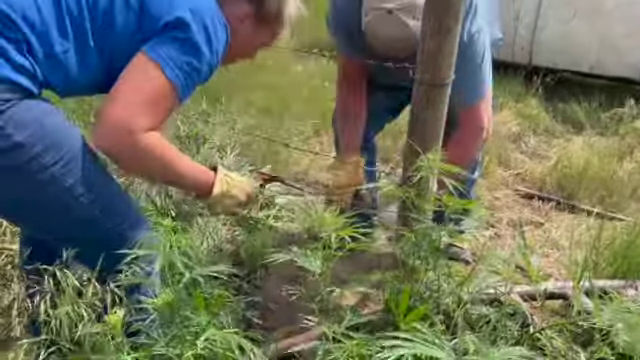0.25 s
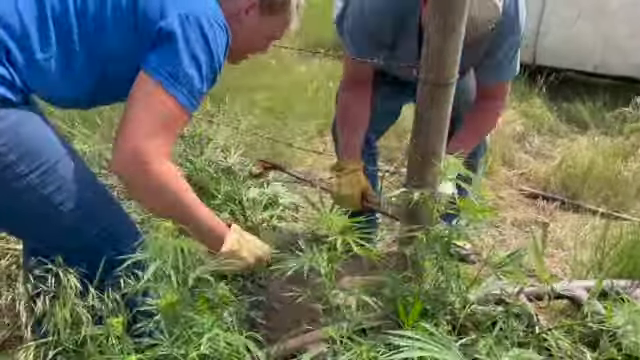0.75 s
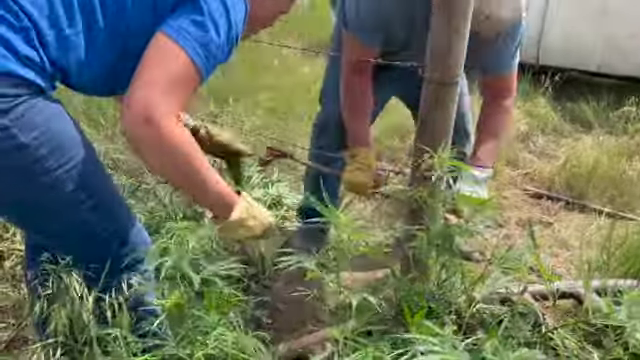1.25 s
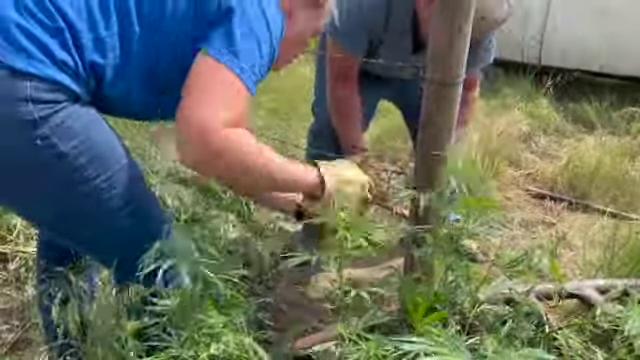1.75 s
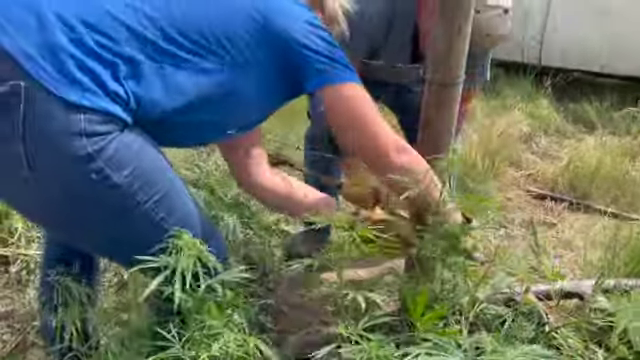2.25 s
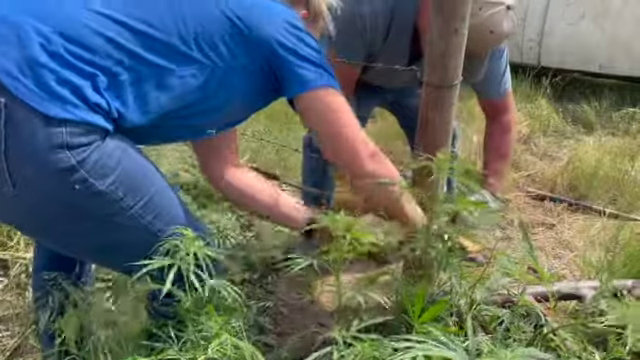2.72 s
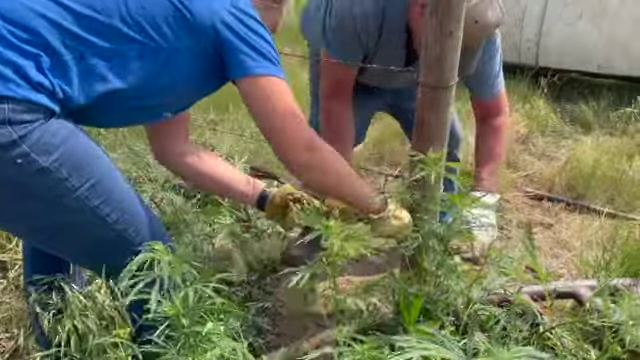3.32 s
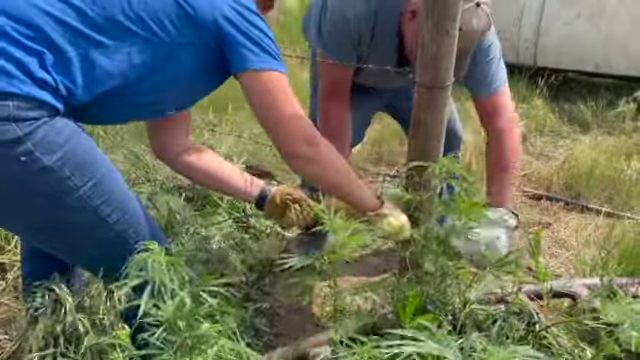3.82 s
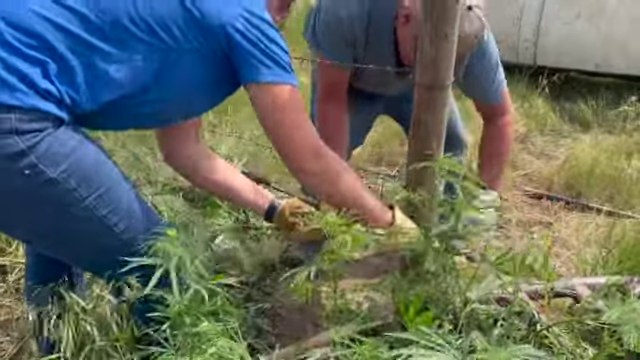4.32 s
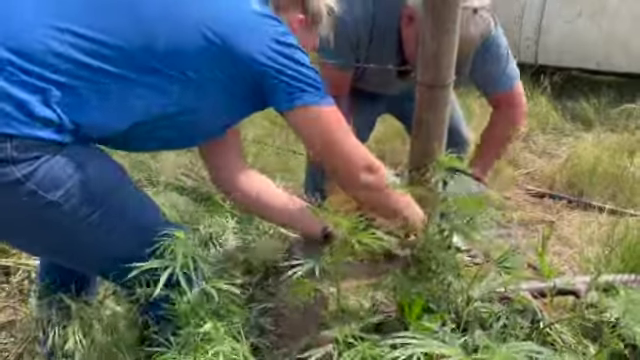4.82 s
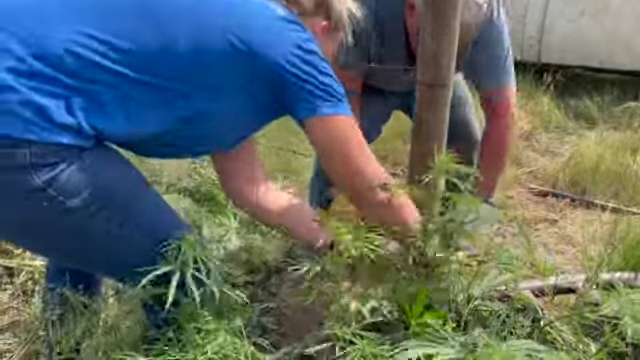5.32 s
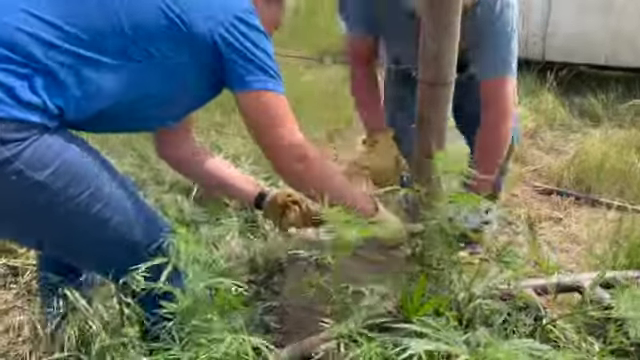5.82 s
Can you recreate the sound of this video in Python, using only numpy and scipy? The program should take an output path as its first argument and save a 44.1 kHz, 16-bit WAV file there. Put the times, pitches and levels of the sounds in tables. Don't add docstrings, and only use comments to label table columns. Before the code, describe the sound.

Outdoors, tough stalks rip and crack up close with brief metallic wire rings, under lumpy wind rumble, faint birdsong and a distant engine.

```python
import sys
import numpy as np
from scipy import signal
from scipy.fft import rfft, irfft, next_fast_len
from scipy.io import wavfile
from scipy.ndimage import uniform_filter1d, map_coordinates

SR = 44100
rng = np.random.default_rng(int(sys.argv[2]) if len(sys.argv) > 2 else 0)


def nominal_scale(level):
    x = np.asarray(level, float) / 20
    return 10 ** x


def dump(signal):
    limited = np.clip(np.atleast_2d(signal).T, -1, 1)
    pcm = np.round(limited * 32767).astype(np.int16)
    wavfile.write(sys.argv[1], SR, pcm)


N = 267466

# frequency in Hz, density in dB per Hz.
FIELD_COLOUR = [(88, -32.5), (140, -6), (230, -12.5), (317, -5.5), (425, -5), (900, 3), (1350, -9),
                (1970, -22), (4510, -15), (5300, -16.5), (7080, -26), (9000, -27.5), (11500, -29),
                (15550, -25), (15950, -64)]
# time in seconds, level in dB.
GRASS_HISS = [(0.0, -76.5), (1.08, -70.5), (1.18, -75), (1.43, -79), (1.57, -61.5), (1.7, -76.5),
              (1.96, -70.5), (2.24, -67.5), (2.48, -67), (2.63, -71.5), (3.07, -68), (3.3, -76),
              (3.85, -75), (4.15, -81.5), (4.3, -71), (4.98, -73), (5.26, -73.5), (6.06, -72)]
# time in seconds, level in dB.
ENGINE_DRONE = [(0, -64), (.7, -60), (1.3, -63), (2.5, -61), (3.5, -60.5), (4.1, -62), (4.45, -59),
                (4.8, -56), (5.4, -56), (5.7, -52), (6.06, -55)]
# frequency in Hz, width in Hz, level in dB.
ENGINE_LINES = [(98.5, 2, -53.5), (897, 9.13, -70.5), (925, 120, -77), (1247, 170, -64), (1696, 370, -68),
                (2190, 220, -69.5), (3308, 200, -78), (3950, 480, -75), (2883, 800, -68)]
# first note in seconds, last note in seconds, starting pitch in Hz, level in dB.
TRILLS = [(0.042, 0.117, 5550, -57.5), (0.187, 0.288, 5630, -55), (0.396, 0.487, 5580, -57.5),
          (0.63, .66, 5600, -57), (0.77, 0.87, 5600, -54.5), (0.994, 1.061, 5600, -56),
          (1.156, 1.253, 5580, -52.5), (1.78, 1.85, 5450, -68), (2.692, 2.76, 5400, -64),
          (3.422, 3.515, 5510, -53.5), (4.023, 4.097, 5580, -55), (4.532, 4.6, 5570, -62),
          (4.644, 4.683, 5930, -49.5), (5.01, 5.077, 5900, -49), (5.474, 5.572, 5900, -46.5),
          (5.648, 5.715, 5600, -55), (5.882, 6.015, 5600, -54)]

# time in seconds, strength in dB.
BREEZE = [(0, -54.5), (.7, -49.5), (1.45, -63.5), (2.4, -41), (3.85, -49.5), (4.6, -37), (5.33, -47.5),
          (6.06, -30)]
# peak in seconds, half-length in seconds, strength in dB,
# flutter over rumble in dB.
GUSTS = [(0.16, 0.051, -35, -2), (0.276, 0.048, -32.5, -12.5), (0.492, 0.084, -35, -3),
         (0.623, 0.043, -43, -1), (0.841, 0.012, -40, -20), (0.981, 0.035, -43.5, -9),
         (1.655, 0.027, -32.5, -11.5), (2.054, 0.044, -35.5, -10), (2.248, 0.027, -35, -4),
         (2.76, 0.016, -31, -2), (2.912, 0.046, -27, -6), (2.992, 0.025, -25.5, 1.5),
         (3.085, 0.14, -37.5, -4), (3.284, 0.051, -33, -5.5), (3.403, 0.038, -31, -20),
         (3.62, 0.048, -29.5, -3), (3.732, 0.1, -38.5, -6), (4.089, 0.096, -32.5, -0.5),
         (4.208, 0.22, -39, -4), (4.328, 0.046, -35, 4), (4.774, 0.071, -36.5, 4.5),
         (4.943, 0.13, -33, -11.5), (5.217, 0.056, -39.5, -5), (5.505, 0.13, -36, -4.5),
         (5.699, 0.056, -30, -10), (5.823, 0.012, -29.5, 0), (6.075, 0.039, -36.5, 2.5)]
# frequency in Hz, density in dB per Hz.
RUMBLE_COLOUR = [(13, -50.5), (22, -38.5), (42, -1), (60, 3.5), (109, -2), (179, 2), (250, 10.5),
                 (320, -15), (550, -120)]
FLUTTER_COLOUR = [(59, -7), (100, 10), (238, -1), (275, -2), (416, -10.5), (560, -17), (720, -25.5),
                  (1000, -55.5), (1300, -58.5), (2200, -120)]
# start in seconds, peak in dB, frequency in Hz.
EDDIES = [(0.128, -42, 194), (0.369, -25.5, 180), (0.436, -18.5, 167), (0.508, -22.5, 240),
          (0.596, -26, 145), (0.992, -35.5, 106), (1.635, -22, 103.7), (2.244, -31.5, 73),
          (2.735, -17.5, 106.2), (2.862, -25, 65.6), (2.991, -20.5, 183), (3.285, -17, 123),
          (3.59, -14, 158.5), (3.63, -14, 114), (4.044, -14.5, 107), (4.235, -15, 117), (4.305, -21.5, 250),
          (4.653, -13.5, 196), (4.717, -33, 244), (5.482, -28, 123), (5.715, -16, 86.7), (5.82, -15.5, 133),
          (6.026, -17, 126)]
# start in seconds, peak in dB, fading time in seconds.
FLAPS = [(0.135, -31, 0.0059), (0.167, -36, 0.0063), (0.208, -32, 0.0068), (0.244, -29, 0.0052),
         (0.298, -32, 0.0046), (0.368, -35.5, 0.0069), (0.439, -22.5, 0.0074), (0.467, -43, 0.0095),
         (0.501, -26.5, 0.011), (0.528, -28.5, 0.0045), (0.595, -35, 0.0066), (0.802, -40.5, 0.0081),
         (0.99, -37.5, 0.0045), (1.116, -39.5, 0.007), (1.209, -44, 0.005), (1.634, -38, 0.0058),
         (2.245, -44, 0.0057), (2.414, -34.5, 0.0069), (2.603, -33.5, 0.0049), (2.733, -38.5, 0.0072),
         (2.865, -26, 0.0083), (2.944, -41, 0.0098), (2.989, -14.5, 0.0075), (3.09, -39, 0.017),
         (3.12, -31.5, 0.0075), (3.223, -33, 0.005), (3.285, -28.5, 0.01), (3.563, -30.5, 0.017),
         (3.593, -19.5, 0.005), (3.628, -26, 0.0082), (3.948, -38, 0.0043), (4.007, -44, 0.0064),
         (4.046, -23, 0.0054), (4.104, -26, 0.0081), (4.235, -24.5, 0.0092), (4.308, -24, 0.0056),
         (4.33, -19, 0.0043), (4.352, -30.5, 0.0046), (4.508, -35, 0.0044), (4.563, -32, 0.0029),
         (4.637, -26, 0.0077), (4.657, -25, 0.011), (4.679, -20.5, 0.0064), (4.716, -17.5, 0.0085),
         (4.768, -20.5, 0.0074), (4.816, -27.5, 0.0062), (4.862, -23, 0.0032), (5.031, -30.5, 0.0063),
         (5.428, -36, 0.0058), (5.478, -35, 0.0096), (5.515, -29, 0.0057), (5.723, -40, 0.0067),
         (5.821, -17.5, 0.0035), (5.944, -26, 0.008), (6.007, -25, 0.0093), (6.032, -21, 0.0055)]

# start in seconds, end in seconds, scrape in dB,
# brightness in dB, wire ring in dB.
PULLS = [(0.64, 0.756, -57.5, -18, 9.5), (1.379, 1.453, -42, 0, -11.5), (1.424, 1.52, -57, -11, 0),
         (2.016, 2.116, -55.5, -17, 3.5), (3.703, 3.796, -55.5, -10, -12.5),
         (3.805, 3.827, -28.5, -2.5, -21.5), (1.537, 1.651, -30, 1, -13.5), (1.655, 1.676, -33, -7, -14),
         (1.684, 1.763, -46.5, -4.5, -14.5), (1.973, 2.056, -41, -6.5, -14), (2.101, 2.269, -35.5, -9, 0),
         (2.172, 2.223, -40, 10, 4.5), (2.395, 2.48, -47.5, -2.5, 7), (2.517, 2.611, -44.5, -10, -29),
         (2.605, 2.625, -45, -16, -22), (2.607, 2.719, -49, -18, -2.5), (2.836, 2.974, -57.5, -3, -18),
         (2.98, 3.01, -26.5, -8, -36), (2.999, 3.108, -43.5, -13.5, -29), (3.175, 3.213, -43, 0, -2.5),
         (3.629, 3.72, -44.5, 10, 5), (3.832, 3.91, -62.5, 12, -9), (4.416, 4.487, -52.5, -5, -16.5),
         (4.442, 4.546, -50.5, -6, -37), (4.718, 4.762, -50.5, 2, -19), (4.798, 4.944, -55.5, -4.5, -18),
         (4.894, 4.992, -40, -10, -4), (5.133, 5.304, -46.5, -6.5, -1)]
# start in seconds, peak in dB, brightness in dB, body in dB, staple ring in dB.
SNAPS = [(1.396, -43.5, 12, -44, -11.5), (1.527, -23, 3, -5.5, -16.5), (1.553, -24, -7, -38, 5.5),
         (1.6721, -5.5, 5, -12, 1), (1.9281, -22.5, -9, -8, -3), (2.161, -21.5, -10, -4.5, -32.5),
         (2.1853, -17, -1.5, -13, -7.5), (2.2028, -18, 2.5, -2, -38), (2.4417, -18, -12, -10, -11),
         (2.533, -15.5, 2.5, -4, -42), (2.526, -18, 3, -3, -48), (2.563, -19.5, -6, -5, -17.5),
         (2.9875, -11, 3, -5.5, -2), (3.0056, -12, -2, -7.5, -33.5), (3.0408, -15, 4.5, -11.5, -29),
         (3.636, -17.5, -6.5, -12, -16), (3.8217, -3.5, 2.5, -12, -13), (4.4738, -14.5, 7.5, -3.5, -18.5),
         (4.7245, -29.5, 0, 2, -16), (5.1752, -19, -9.5, -9, -19), (5.2233, -19, -8.5, -5, -4),
         (5.4435, -21.5, -3.5, 2.5, -40)]
# start in seconds, peak in dB, brightness in dB.
TICKS = [(0.64, -43, 8), (.657, -39.5, 3), (2.209, -24.5, -8), (2.214, -22, -4), (2.179, -27.5, 1.5),
         (5.236, -27, 6), (5.157, -39, -20), (4.9013, -37, -5), (3.0022, -21, -3), (0.7036, -30, -8),
         (0.836, -43, -1), (0.893, -44, 0), (0.951, -41.5, -4), (1.357, -41, -22), (1.3875, -33.5, 3),
         (1.008, -45, -15), (1.519, -37.5, -10), (2.6007, -32, -1), (4.456, -38.5, 0), (4.741, -31, -1),
         (4.5, -46, 7), (4.946, -26, -12), (5.166, -34, -13), (5.246, -34, 5), (1.884, -27, -7.5),
         (1.956, -33, -13), (1.996, -38.5, -13), (2.129, -27, -23), (2.6087, -27.5, 9), (2.6493, -33, 2.5),
         (2.835, -31.5, -23), (2.8588, -25, 2), (2.908, -28.5, -29), (2.934, -35.5, -11),
         (3.183, -41, -17.5), (3.277, -33, -5.5), (3.366, -36.5, -7), (3.872, -39.5, 4.5), (3.662, -44, 6),
         (4.297, -23, -7), (4.3635, -30.5, -1), (4.435, -27, -30), (4.767, -32, -15), (4.937, -28, -9),
         (5.1027, -22.5, -22), (5.127, -26.5, -14), (5.198, -20.5, -10)]
# frequency in Hz, density in dB per Hz.
STEM_COLOUR = [(290, -53), (500, -16), (720, -14), (1240, -7), (1450, -11), (2260, -3.5), (3070, 11),
               (5040, 6.5), (6500, 5), (8500, 0), (11600, -6.5), (15100, -9), (16000, -23), (16700, -64.5)]
# frequency in Hz, density in dB per Hz.
BLUR_COLOUR = [(500, -9), (1500, -15), (3200, 7), (4800, 1), (7000, -18), (12000, -28.5), (16000, -32.5),
               (16600, -91.5)]
# frequency in Hz, level in dB, 60 dB decay in seconds.
WIRE_MODES = [(2700, -11, .1), (3250, -7, .16), (3385, -4, .25), (3490, -7, .16), (3612, -3, .3),
              (3680, -3, .3), (3790, -5, .3), (3915, -5, .25), (4338, -6, .2), (4760, -8, .15),
              (5400, -12, .12), (10800, -18, .05)]
# frequency in Hz, level in dB, 60 dB decay in seconds.
STAPLE_MODES = [(3055, -2, .33), (3095, -4, .25), (3150, -6, .2), (6200, -17, .05), (11400, -16, .04)]
# start in seconds, length in seconds, pitch in Hz, level in dB.
SQUEAKS = [(1.402, .022, 6230, -33), (1.395, 0.047, 4820, -40), (1.395, .04, 11100, -43),
           (1.39, .06, 3100, -50.5), (2.994, .01, 3100, -26), (.657, .03, 14700, -52.5),
           (1.527, 0.013, 11500, -35), (1.55, 0.035, 11500, -31), (1.565, .025, 14700, -36.5),
           (1.568, .07, 3030, -36), (1.58, 0.046, 6230, -40.5), (1.6722, 0.013, 6700, -21.5),
           (1.6722, .014, 3070, -32.5), (1.6722, 0.011, 11400, -22), (1.987, .03, 3100, -42.5),
           (1.99, .025, 4970, -49), (2.02, .03, 4440, -54), (2.19, .01, 4500, -30),
           (2.1615, .012, 4400, -33.5), (2.194, .035, 6250, -36), (2.203, .12, 3600, -47.5),
           (2.125, .1, 1150, -48), (2.417, 0.066, 3400, -47), (2.422, .03, 6150, -54.5),
           (2.527, .02, 5280, -38.5), (2.524, 0.022, 6640, -34.5), (2.601, .025, 5000, -42),
           (2.597, .025, 3470, -49), (3.003, 0.011, 3700, -23.5), (3.002, .008, 4400, -25),
           (3.028, .06, 3100, -51), (3.0425, .008, 11400, -32), (3.662, .035, 4780, -37.5),
           (3.665, .05, 6200, -40.5), (3.657, .07, 10600, -43.5), (3.661, .05, 3250, -44.5),
           (3.8215, 0.012, 3120, -27.5), (3.8215, 0.013, 6190, -24), (3.8215, .014, 11800, -24),
           (4.432, .05, 5130, -45.5), (4.47, .07, 3040, -56), (4.4726, .014, 6300, -32.5),
           (5.444, .008, 14600, -33), (4.903, 0.095, 3250, -50), (4.905, .07, 2400, -47.5),
           (4.937, 0.027, 4340, -43.5), (5.1755, .007, 3750, -35), (5.198, .014, 4400, -38.5),
           (5.2235, .014, 3500, -37), (5.4432, 0.0089, 4640, -32)]
# start in seconds, level in dB, pitch in Hz.
KNOCKS = [
    (1.955, -38.5, 975),
    (1.995, -37.5, 805),
    (2.025, -37, 1208),
    (4.863, -36.5, 1060),
    (4.94, -32.5, 737),
    (5.16, -36.5, 517),
    (5.198, -36.5, 701),
    (5.224, -37, 756),
    (5.444, -32.5, 634),
]

# frequency in Hz, side minus mid in dB.
PORTS_FAR = [(60, -39), (160, -40.5), (270, -13.5), (500, 0), (1200, -5), (3300, -4), (5600, 0), (7000, -1),
             (7500, 6.5), (7900, 26), (9500, 27), (10000, 4.5), (11000, -2), (11600, -26.5), (15000, -41)]
PORTS_WIND = [(40, -40), (85, -25), (180, -13), (350, -7), (700, -3)]
PORTS_NEAR = [(60, -37), (270, -16.5), (500, -8.5), (1200, -10), (3300, -6.5), (5600, -4), (7000, -2),
              (7700, 7.5), (8900, 9.5), (9900, 3), (11200, -5), (12000, -6.5), (15000, -30)]
# frequency in Hz, phase in radians.
SIDE_PHASE = [(200, 1.5), (1000, 1.3), (2800, 1.5), (4500, -2), (9000, -1.6)]


def unit(x):
    return x / np.sqrt(np.mean(x ** 2) + 1e-20)


def along(points, hz):
    f, v = np.transpose(points)
    return np.interp(np.log(hz + 1), np.log(f + 1), v)


def over_time(rows):
    s, level = np.transpose(rows)
    return np.interp(np.arange(N) / SR, s, level)


def wobble(rate):
    knots = 1.6 * np.tanh(rng.standard_normal(int(N * rate / SR) + 4) / 1.3)
    return map_coordinates(knots, [np.arange(N) * rate / SR])


def filtered(x, response):
    m = next_fast_len(N + SR // 2)
    return irfft(rfft(x, m) * response(np.fft.rfftfreq(m, 1 / SR)), m)[..., :N]


def patchy(x, depth_db, size=256):
    z = signal.stft(x, nperseg=size)[2]
    patches = uniform_filter1d(rng.standard_normal(z.shape[1:]), size=4, axis=0)
    patches = uniform_filter1d(patches, size=9, axis=1)
    return unit(signal.istft(z * nominal_scale(depth_db * unit(patches)), nperseg=size)[1][:, :N])


def coloured(spectrum, lo_hz=0, hi_hz=30000, patchy_db=0, size=256):
    def response(hz):
        low_edge = 1 / (1 + (lo_hz / (hz + 1)) ** 8)
        high_edge = 1 / (1 + (hz / hi_hz) ** 8)
        return nominal_scale(along(spectrum, hz)) * low_edge * high_edge

    noise = patchy(rng.standard_normal((2, N)), patchy_db, size)
    return unit(filtered(noise, response))


def ports(pair, side_db, alike):
    turn = lambda hz: np.arctan(nominal_scale(along(side_db, hz)))
    mid = filtered(pair[0], lambda hz: np.cos(turn(hz)))
    scattered = alike * pair[0] + np.sqrt(1 - alike ** 2) * pair[1]
    side = filtered(scattered, lambda hz: np.sin(turn(hz)) * np.exp(1j * along(SIDE_PHASE, hz)))
    return np.array([mid + side, mid - side])


def grass():
    level_db = over_time(GRASS_HISS) + 8 + 1.5 * wobble(7)
    return nominal_scale(level_db) * coloured(FIELD_COLOUR, 4300, patchy_db=2.5)


def engine():
    drone = nominal_scale(over_time(ENGINE_DRONE) + 2.5) * coloured(FIELD_COLOUR, 0, 4000, patchy_db=1.5, size=1024)
    for hz, width_hz, db in ENGINE_LINES:
        line = filtered(rng.standard_normal((2, N)), lambda f: 1 / (1 + ((f - hz) / width_hz * 2) ** 2))
        drone += nominal_scale(db) * unit(line)
    return drone


def birds():
    song, t = np.zeros(N + SR), np.arange(round(0.0266 * SR)) / SR
    for first, last, hz, db in TRILLS:
        count = round((last - first) / .033) + 1
        for s in np.linspace(first, last, count):
            pitch = hz * rng.normal(1, 0.0046) - 700 * (t / t[-1]) ** 1.05
            note = np.hanning(len(t)) * np.sin(2 * np.pi * np.cumsum(pitch) / SR)
            song[round(s * SR):][:len(t)] += nominal_scale(db - 5 + rng.normal(0, 2.7)) * note
    smear = nominal_scale(-18 - 60 * t / .04) * rng.standard_normal((2, len(t)))
    smear[:, 0] = 1
    smear /= np.linalg.norm(smear[0])
    return signal.fftconvolve(song[None, :N], smear, axes=1)[:, :N] * [[1], [.4]]


def field():
    return ports(grass() + engine() + birds(), PORTS_FAR, alike=0.45)


def airflow():
    breeze_db = over_time(BREEZE)
    rumble = nominal_scale(breeze_db)
    flutter = nominal_scale(-56.5 + 1.4 * (breeze_db + 45.0))
    for s, half_s, db, flutter_db in GUSTS:
        swell = nominal_scale(db) * np.exp(-np.abs((np.arange(N) / SR - s) / half_s) ** 3.7)
        rumble = np.hypot(rumble, swell)
        flutter = np.hypot(flutter, swell * nominal_scale(flutter_db - 3.5))
    return rumble, flutter


def eddies():
    swirls, t = np.zeros(N + SR), np.arange(SR // 10) / SR
    for s, db, hz in EDDIES:
        swirl = np.sin(2 * np.pi * hz * t)
        swirl += .8 * np.sin(2 * np.pi * 2.7 * hz * t) * np.exp(-1.5 * t * hz)
        swirls[round(s * SR):][:len(t)] += nominal_scale(db + 4.0) * t * hz * np.exp(-1.3 * t * hz) * swirl
    return swirls[:N]


def flaps():
    bursts, t = np.zeros((2, N + SR)), np.arange(SR // 10) / SR
    noise = coloured(FLUTTER_COLOUR, 190)
    for s, db, fading_s in FLAPS:
        burst = noise[:, round(s * SR * .9):][:, :len(t)] * t * np.exp(-t / max(fading_s, .003))
        bursts[:, round(s * SR):][:, :len(t)] += nominal_scale(db - 1.0) * burst / np.abs(burst[0]).max()
    return bursts[:, :N] * [[1], [.6]]


def wind():
    rumble, flutter = airflow()
    air = rumble * unit(nominal_scale(0.41 * wobble(18)) * coloured(RUMBLE_COLOUR, 0, 149.2))
    air += flutter * unit(nominal_scale(2.5 * wobble(60)) * coloured(FLUTTER_COLOUR, 140))
    return ports(air + eddies() + flaps(), PORTS_WIND, alike=.35)


def post():
    raps, t = np.zeros(N + SR), np.arange(SR // 10) / SR
    for s, db, hz in KNOCKS:
        envelope = nominal_scale(db - 60 * t / 0.062) * (1 - np.exp(-t / 0.00079))
        raps[round(s * SR):][:len(t)] += envelope * np.sin(2 * np.pi * hz * t)
    return raps[:N]


def squeaks():
    song = np.zeros((2, N + SR))
    for s, length, hz, db in SQUEAKS:
        size = round(max(length, .005) * SR)
        b, a = signal.iirpeak(hz, 1 / 0.016, SR)
        tone = signal.lfilter(b, a, rng.standard_normal(SR // 4))[-size:]
        bluntness = .3 if length < .0145 else .63
        tone = tone * np.sin(np.pi * np.linspace(0, 1, size) ** bluntness)
        song[:, round(s * SR):][:, :size] += nominal_scale(db) * unit(tone)
    return song[:, :N]


def ringing(shake, modes):
    def response(f):
        total = 0
        for hz, db, t60 in modes:
            damping = 1j * f * np.log(1000) / np.pi / t60
            total = total + nominal_scale(db) * damping / (hz * hz - f * f + damping)
        return total

    ring = filtered(shake * patchy(rng.standard_normal((2, N)), depth_db=6.0), response)
    return ring * nominal_scale(3.5 * wobble(55))


def pull_efforts():
    level = np.zeros((5, N + SR))
    fibres = unit(nominal_scale(4 * wobble(450) + 1.5 * wobble(70)))
    for start, end, db, bright_db, wire_db in PULLS:
        body_db = -5.5 - 0.3 * (db + 46.5)
        size, at = max(round((end - start) * SR), 100), round(start * SR)
        stroke = nominal_scale(db) * np.sin(np.pi * np.linspace(0, 1, size)) * fibres[at:][:size]
        level[:, at:][:, :size] += stroke * nominal_scale([[0], [bright_db], [body_db], [wire_db], [-13]])
    return level[:, :N]


def break_efforts():
    level, t = np.zeros((5, N + SR)), np.arange(SR // 8) / SR
    ticks = []
    for s, db, bright_db in TICKS:
        body_db = -0.5 - 0.81 * (db + 41)
        ticks.append((s, db, bright_db, body_db, -12))
    for s, db, bright_db, body_db, staple_db in SNAPS + ticks:
        t60, rise_s = (.05, 0.0026) if db > -21 else (.045, 0.0029)
        crack = nominal_scale(db - 12.5 - 60 * t / t60) * (1 - np.exp(-t / rise_s))
        crack *= 1 + 3 * np.exp(-t / 0.0027)
        level[:, round(s * SR):][:, :len(t)] += crack * nominal_scale([[0], [bright_db], [body_db], [-22], [staple_db]])
    return level[:, :N]


def tearing(main, bright, body):
    tear = main * coloured(STEM_COLOUR, 2400, 8000, patchy_db=4, size=512)
    tear += bright * coloured(STEM_COLOUR, 8000, patchy_db=3)
    tear += body * coloured(STEM_COLOUR, 0, 2270, patchy_db=2.0)
    return tear


def blur(main):
    fading = nominal_scale(-120 * np.arange(SR // 2) / SR / 0.62)
    lingering = np.sqrt(np.abs(signal.fftconvolve(main ** 2, fading / fading.sum())[:N]))
    return nominal_scale(-14.0) * lingering * coloured(BLUR_COLOUR, patchy_db=5.5, size=1024)


def weeds():
    main, bright, body, bowing, blows = pull_efforts() + break_efforts()
    steel = nominal_scale(20.5) * ringing(bowing, WIRE_MODES) + nominal_scale(23) * ringing(blows, STAPLE_MODES)
    near = tearing(main, bright, body) + steel + blur(main) + post() + squeaks()
    return ports(near, PORTS_NEAR, alike=.72)


def scene():
    return field() + wind() + weeds()


def top_cut(x):
    return signal.sosfilt(signal.butter(12, 16970, fs=SR, output="sos"), x)


def record(dry):
    rounded = dry / (1 + np.abs(dry / .95) ** 4) ** (1 / 4)
    return top_cut(rounded)


dry = scene()
out = record(dry)
dump(out)
```